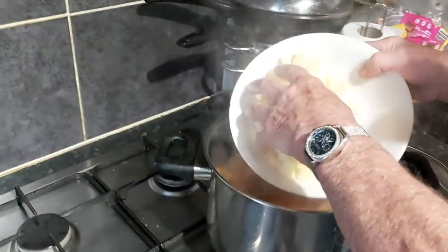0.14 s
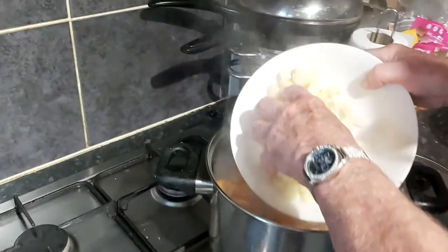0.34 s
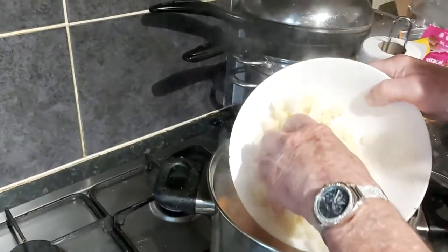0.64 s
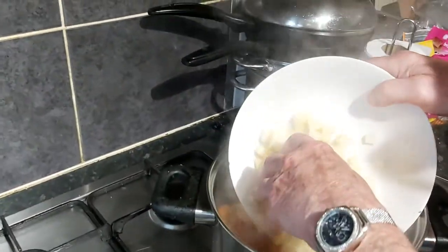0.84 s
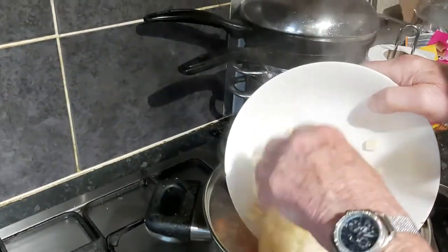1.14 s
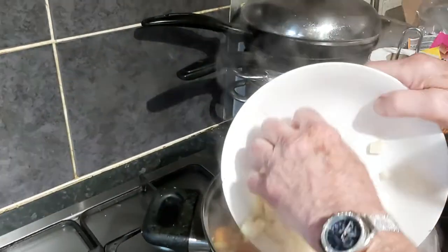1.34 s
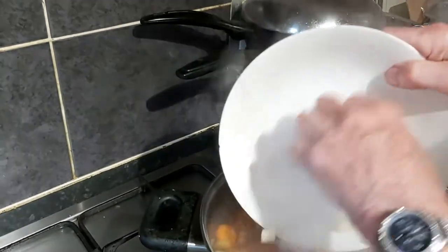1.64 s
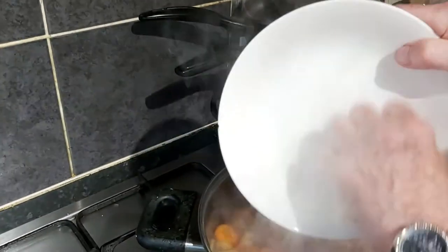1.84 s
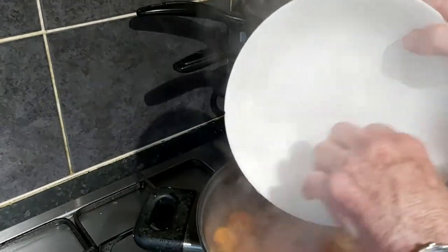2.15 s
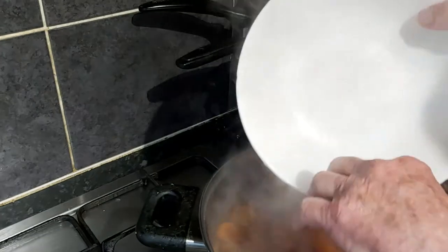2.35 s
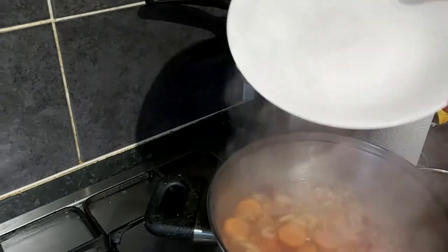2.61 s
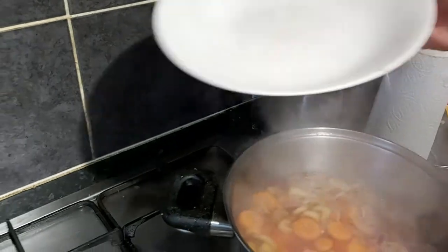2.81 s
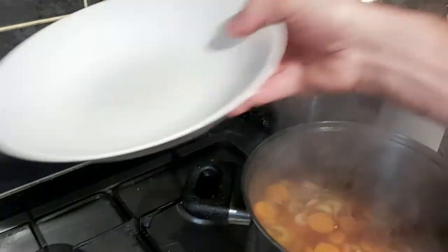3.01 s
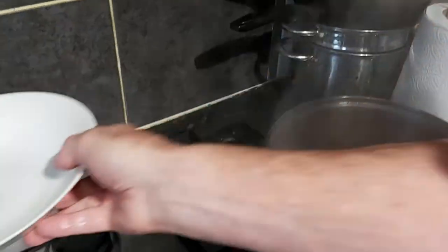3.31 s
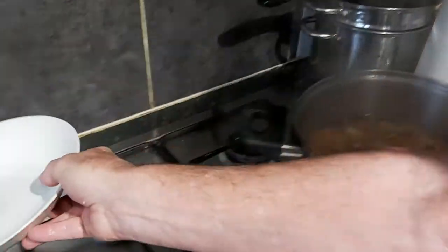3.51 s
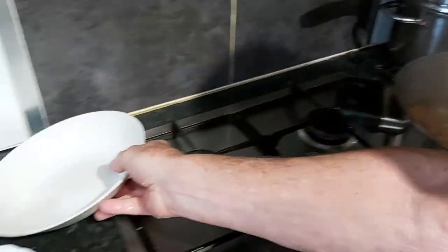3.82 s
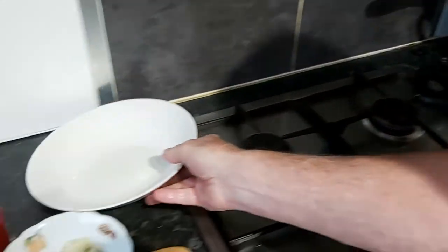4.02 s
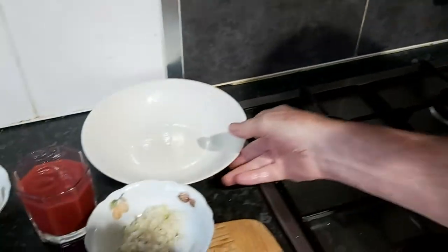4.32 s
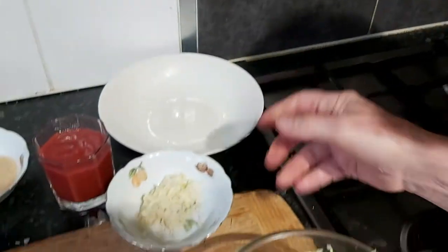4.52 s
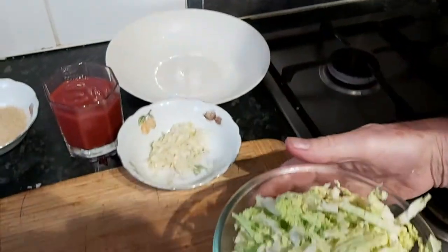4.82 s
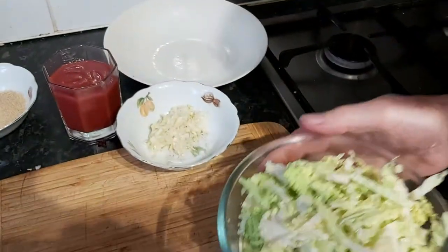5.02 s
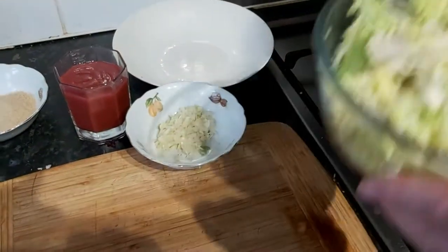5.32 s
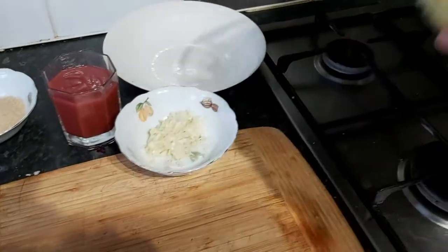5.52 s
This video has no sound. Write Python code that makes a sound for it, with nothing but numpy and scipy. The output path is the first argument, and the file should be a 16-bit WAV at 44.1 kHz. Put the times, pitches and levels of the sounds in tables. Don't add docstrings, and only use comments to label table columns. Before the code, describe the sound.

A small tiled kitchen, heard closely in stereo: a low, patchy pot simmer with faint mains hum and weak, fluttering steam hiss runs throughout. At about 0.46 s the first potato pieces hit the broth with a wet splash and deep gulp. Smaller plops follow around 0.8 to 1.2 s, then the thickest splash from 1.45 to 1.75 s, full of sharp spits, bubbling gulps and droplets. Light drips and faint finger rubbing on the plate fade towards 2.4 s. A soft bump comes at 3.1 s. At 3.89 s the empty ceramic plate strikes stone with the loudest, hard clack, chattering and bouncing until about 4.1 s; a second run of rocking knocks at 4.25 to 4.5 s leaves a short ceramic ring that is choked by 4.8 s. Quiet dish handling follows near 4.8 s as the simmer dips, and a small bright clink-like contact lands at 5.56 s.

```python
import sys
import numpy as np
from scipy import signal
from scipy.io import wavfile

SR = 44100
rng = np.random.default_rng(int(sys.argv[2]) if len(sys.argv) > 2 else 0)


def boost(x):
    u = np.asarray(x, float) / 20
    return 10 ** u


def int16_out(signal):
    q = np.round(np.clip(np.atleast_2d(signal).T, -1, 1) * 32767)
    wavfile.write(sys.argv[1], SR, q.astype(np.int16))


N = 249385


def rms_one(x):
    return x / np.sqrt(np.mean(x ** 2) + 1e-30)


def gain_curve(points):
    s, level_db = np.transpose(points)
    return boost(np.interp(np.arange(N) / SR, s, level_db, -200, -200))


def at_hz(points, hz):
    table_hz, value = np.transpose(points)
    return np.interp(np.log(hz), np.log(table_hz), value)


def drift(rate_hz):
    knots = rng.standard_normal(400)
    return np.interp(np.arange(N) / SR * rate_hz, np.arange(400), knots)


def stroke(start_s, attack_s, hold_s, level_db, fall_db_per_s):
    out = np.zeros(N)
    start = round(start_s * SR)
    t = np.arange(N - start) / SR
    t = t[t < hold_s + 90 / fall_db_per_s]
    fall_db = fall_db_per_s * np.maximum(t - hold_s, 0)
    out[start:start + len(t)] = boost(level_db - fall_db) * np.minimum(t / attack_s, 1)
    return out


def clicks(times_s, gains):
    out = np.zeros(np.shape(gains)[:-1] + (N,))
    out[..., np.round(np.array(times_s) * SR).astype(int)] = gains
    return out


def grains(per_s, spread_db, clump_db):
    sizes = boost(spread_db * np.minimum(rng.exponential(1, N), 4)) * rng.choice([-1, 1], N)
    chance = per_s * boost(clump_db * drift(40)) / SR
    return rms_one(sizes * (rng.random(N) < chance))


def ring(drive, hz, t60_s):
    r = boost(-60 / (t60_s * SR))
    w = 2 * np.pi * hz / SR
    return signal.lfilter([0, np.sin(w)], [1, -2 * r * np.cos(w), r * r], drive + 1e-18)


def radiate(tone, hz, pan_db=0.8, lead_cycles=-0.088):
    left = np.roll(tone, -round(lead_cycles * SR / hz))
    return np.array([left, tone]) * boost(np.minimum([[pan_db], [-pan_db]], 0))


def stereo_bands(spectrum, size):
    # hz, likeness
    likeness = [(60, 0.88), (130, 0.98), (290, 0.6), (640, 0.46), (1410, -0.44), (3100, 0.35),
                (6820, -0.39), (15000, 0.074)]
    # hz, left_right_db
    tilt = [(60, 0), (300, -4), (3000, -2.5), (8000, -4)]
    edges_hz = 35 * 2 ** np.arange(0, 9.1, .5)
    white = rng.standard_normal((2, 2, size))
    for k, (low_hz, high_hz) in enumerate(zip(edges_hz, edges_hz[1:])):
        band = signal.butter(2, [low_hz, high_hz], "band", fs=SR, output="sos")
        mid, side = signal.sosfilt(band, white[k % 2])
        hz = np.sqrt(low_hz * high_hz)
        alike = np.clip(at_hz(likeness, hz), -1, 1)
        gain = boost(at_hz(spectrum, hz) + at_hz(tilt, hz) * np.array([[.5], [-.5]]))
        yield hz, gain * (np.sqrt(1 + alike) * mid + np.sqrt(1 - alike) * side * [[1], [-1]])


def struck(trains, spectrum, t60s, low_hz, high_hz, direct, swell_cycles, crack_s, room_db):
    room_t60_s = 0.35
    size, spots = SR // 4, 3
    t = np.arange(size) / SR
    parts = np.zeros((3, 2, spots, size))
    for hz, band in stereo_bands(spectrum, (spots + 1) * size):
        rise = 1 - np.exp(-t * hz / swell_cycles)
        tail = boost(-60 * t / at_hz(t60s, hz))
        tail += direct * np.exp(-t / crack_s)
        tail += boost(room_db - 60 * t / room_t60_s)
        part = int(hz > low_hz) + int(hz > high_hz)
        parts[part] += band[:, size:].reshape(2, spots, size) * rise * tail
    parts /= np.sqrt(np.sum(parts ** 2, axis=(1, 3), keepdims=True) / 2)
    spot = rng.integers(0, spots, N)
    out = np.zeros((2, N + size - 1))
    for k in range(spots):
        hits = np.float32(trains * (spot == k))
        out += signal.oaconvolve(hits, np.float32(parts[:, :, k]), axes=2).sum(axis=0)
    return out[:, :N]


def simmer():
    # hz, level_db_per_hz
    rumble_spectrum = [(18, -45), (30, -22.5), (53, -5), (70, -26), (103, -17.5), (157, -28), (194, -13.5),
                       (273, -21.5), (364, -8), (437, -14), (684, -24), (2060, -24.5), (2400, -26),
                       (3100, -37.5), (16000, -45)]
    # start_s, level_db
    facing_points = [(0, -0.5), (1.0, 0.5), (3.0, 1), (3.85, -0.5), (4.9, -5), (5.3, -4), (5.65, 1.5)]
    # pitch_hz, level_db, waver_db, share of the facing fall
    hum = [(50, -82.5, 5, .9), (101, -73, -1.5, 1.2), (200, -84, 5, 0.61), (292, -75, 5.5, 0.31),
           (364.6, -69, 4.5, 3.2), (412, -77, 2, 1.2), (469, -78.5, 1.5, 1.3)]
    # start_s, level_db
    steam = [(0.0, -73), (0.13, -71), (0.3, -79.5), (0.84, -85.5), (1.06, -74.5), (1.45, -78.5), (2.3, -77),
             (3.6, -87)]
    facing = gain_curve(facing_points)
    rumble = rms_one(sum(band * boost(0.95 * drift(9.3)) for _, band in stereo_bands(rumble_spectrum, N)))
    out = boost(-67) * rumble * facing
    for hz, level_db, waver_db, fall in hum:
        phase = 2 * np.pi * hz * np.arange(N) / SR + 0.41 * waver_db * drift(12)
        gain = boost(level_db + np.clip(waver_db, 0, 5) * drift(6.5)) * facing ** fall
        out += gain * np.sin(phase) * boost([[-1.1], [1.1]])
    treble = signal.butter(2, 6000, "high", fs=SR, output="sos")
    hiss = rms_one(signal.sosfilt(treble, rng.standard_normal((2, N))))
    flutter = boost(7.0 + 1.5 * drift(24) + 2.5 * drift(57))
    return out + hiss * gain_curve(steam) * flutter * boost([[-2.5], [2.5]])


def droplets(level):
    spray = level * grains(170, 3.7, 9.7)
    dealt = rng.integers(0, 14, N)
    out = np.zeros((2, N))
    for k, hz in enumerate(np.geomspace(1000, 5500, 14)):
        pan_db = 0.81 * rng.standard_normal() + 4.0
        out += ring(spray * (dealt == k), hz, 17.0 / hz) * boost([[pan_db], [-pan_db]])
    return out


def broth():
    # start_s, peak_db, low plop_db re peak,
    # bright spit_db re peak
    splashes = [(0.4623, -30.5, 8, 10.5), (0.4933, -35, -2.5, 8.5), (0.503, -40, -14, -21),
                (0.8129, -40, -2, -18), (0.926, -48, -5, 8), (0.9526, -46, -6, -10), (0.9888, -31, -26, -1),
                (1.0946, -57, 5, -17), (1.1156, -36.5, -3, -10), (1.1586, -44.5, -23, 1),
                (1.175, -44, -22, -11), (1.2008, -42.5, -3.5, -3), (1.3008, -42.5, -35, 5.5),
                (1.4558, -39, -20, 8), (1.5044, -37, -15, -3), (1.5277, -19.5, -49.5, 2.5),
                (1.532, -25, -18, -1.5), (1.583, -29, -19, 3), (1.589, -28.5, -21, -1),
                (1.641, -27, -20, -8), (1.673, -29, -22, -1), (1.6206, -21.5, -16.5, -9.5),
                (1.6269, -20.5, -7.5, -5), (1.6675, -24, -3, 4), (1.6833, -26, -25, -1.5),
                (1.694, -22, -27, -10), (1.7482, -37, 1, 8), (1.868, -43, -4, -25), (1.9779, -53.5, 6, 3),
                (2.0704, -49, 13.5, 4.5), (5.565, -35.5, -31, 5), (5.5738, -44, -44, 6)]
    # start_s, hold_s, level_db, bright_db, fall_db_per_s
    pours = [(0.461, 0.027, -30.5, -1.5, 226), (0.81, 0.016, -46.5, -3, 185), (0.931, 0.092, -57, -2, 153),
             (1.053, 0.22, -62, -1, 23), (1.451, 0.12, -50, 0, 99), (1.53, 0.14, -39, 12, 164),
             (1.623, 0.1, -42, 2.5, 167), (1.903, 0.2, -64.5, 12, 110), (0.58, 0.014, -69, 22, 193),
             (2.286, 0.024, -61.5, -5.5, 266), (4.799, 0.054, -64, -3.5, 300), (5.561, 0.045, -51.5, 2, 60)]
    # hz, level_db_per_hz
    spectrum = [(26, -38), (45, -2.5), (150, -8.5), (239, -9.5), (382, 5.5), (594, -2.5), (689, -4),
                (1440, -9), (1980, -2), (2410, -6), (3850, -10), (5290, -9.5), (11300, -9), (16000, -15.5)]
    # hz, t60_s
    t60s = [(150, 0.48), (600, 0.25), (2000, 0.19), (6000, 0.18), (15000, 0.051)]
    layer_db = [-4.5, -1, -7.5]
    layer_fall = [0.74, 1.0, 1.2]
    layer_tilt = [-2.2, 0, 0.59]
    s, peak_db, plop_db, spit_db = np.transpose(splashes)
    pan_db = 2 + 5 * rng.standard_normal(len(s))
    levels = boost(peak_db + np.array([plop_db + 10.5, 0 * s + 12, spit_db + 12.5]))
    hits = clicks(s, levels[:, None] * boost(np.outer([.5, -.5], pan_db)))
    churn = np.zeros((3, N))
    for layer, tilt, offset_db, share in zip(churn, layer_tilt, layer_db, layer_fall):
        for start_s, hold_s, level_db, bright_db, fall in pours:
            layer += stroke(start_s, 0.0025, hold_s, level_db + offset_db + tilt * bright_db, share * fall)
    rain = np.array([grains(900, 2.3, 2.2), grains(500, 1.4, 6.6), grains(1200, 6.5, 3.9)])
    spray = churn * rain * boost([[-5], [-7], [-5]])
    wet = struck(hits + spray[:, None], spectrum, t60s, 800, 4500,
                 direct=5.5, swell_cycles=0.6, crack_s=0.0028, room_db=-25)
    return wet + boost(-27.5) * droplets(churn[1])


def gulps():
    # start_s,
    # pitch_hz, level_db, t60_s
    pockets = [(0.498, 230, -25.5, 0.047), (0.508, 409, -40.5, 0.08), (0.528, 420, -39, 0.05),
               (0.54, 200, -41, 0.13), (0.562, 286, -37.5, 0.18), (0.592, 320, -49, 0.1),
               (0.83, 294, -44.5, 0.25), (0.845, 287.6, -41, 0.18), (0.88, 294, -49, 0.19),
               (1.092, 880, -50, 0.047), (1.175, 950, -48.5, 0.046), (1.19, 905, -48, 0.04),
               (1.53, 1060, -38.5, 0.022), (1.553, 1143, -41, 0.065), (1.582, 584, -37, 0.07),
               (1.598, 606, -39, 0.074), (1.619, 2270, -35.5, 0.03), (1.627, 1900, -33, 0.04),
               (1.638, 1940, -35, 0.073), (1.644, 547, -37, 0.06), (1.657, 564, -37, 0.062),
               (1.668, 2113, -37, 0.05), (1.68, 542, -30, 0.057), (1.69, 2000, -35, 0.05),
               (1.694, 1530, -41, 0.03), (1.702, 540, -41, 0.068), (1.74, 558, -47, 0.08),
               (1.755, 477, -47, 0.14), (1.773, 1520, -46, 0.044), (1.783, 571, -45.5, 0.08),
               (2.07, 566, -52, 0.04), (0.988, 2200, -43, 0.03), (0.989, 1800, -45, 0.03),
               (1.117, 2100, -52, 0.03), (1.455, 2900, -45, 0.03), (1.456, 3700, -52, 0.025),
               (1.5, 1000, -48, 0.03), (1.505, 2100, -47, 0.03), (1.527, 3900, -34, 0.025),
               (1.529, 2600, -37, 0.04), (1.621, 3600, -40, 0.03), (1.817, 2000, -50, 0.05),
               (1.869, 1600, -48, 0.03), (1.87, 3700, -57, 0.025), (1.977, 1200, -53, 0.03),
               (3.14, 234, -47, 0.055)]
    rise_per_s, wobble_db, wobble_rad = 0.15, 4.0, 0.8
    out = np.zeros(N)
    t = np.arange(SR // 3) / SR
    for s, hz, level_db, t60_s in pockets:
        swell, turn = (np.interp(t * 130, np.arange(60), knots) for knots in rng.standard_normal((2, 60)))
        phase = 2 * np.pi * hz * (t + rise_per_s * t ** 2) + wobble_rad * turn
        gain = boost(level_db - 60 * t / t60_s + wobble_db * swell) * (1 - np.exp(-t * hz / 0.66))
        start = round(s * SR)
        out[start:start + len(t)] += gain * np.sin(phase)
    return out * boost([[-1.2], [1.2]])


def bumps():
    # start_s, level_db, centre_hz
    drips = [(0.786, -77, 13000), (0.975, -66, 14000), (1.009, -55.5, 10600), (1.0596, -62, 13100),
             (1.083, -61, 12900), (1.144, -63, 7000), (1.2336, -61.5, 6040), (1.2907, -65, 10700),
             (1.3447, -65, 10400), (1.3648, -65.5, 2780), (1.817, -62.5, 10400), (1.995, -62.5, 12900),
             (2.042, -64, 9600), (2.062, -64, 13100), (2.098, -65, 12000), (2.119, -66, 9350),
             (2.154, -70, 6960), (2.1847, -69, 6960), (2.22, -72.5, 7200), (2.234, -71, 13000),
             (2.3, -68, 12000), (2.34, -69, 9000), (2.378, -78, 12000)]
    # start_s, centre_hz, width_octaves, level_db, t60_s
    contacts = [(2.287, 990, 2.9, -62, 0.36), (2.294, 2100, 0.33, -63, 0.33),
                (2.33, 2320, 0.78, -59, 0.085), (3.131, 1500, 1.4, -50, 0.12),
                (3.145, 1400, 1.2, -61, 0.32), (4.245, 345, 0.63, -42, .08), (4.256, 340, .4, -47, 0.09),
                (4.268, 350, 0.46, -32.5, 0.19), (3.135, 230, 0.9, -57, 0.4), (4.571, 71, 0.71, -55, 0.32),
                (4.795, 2130, 0.24, -71, 0.49), (4.853, 4070, 0.14, -77, 0.17),
                (4.852, 200, 1.4, -59, 0.38), (4.858, 79.1, 1.23, -66, 0.13),
                (5.564, 4240, 0.55, -41.5, 0.13), (5.575, 1920, 0.97, -42.5, 0.12)]
    puffs = list(contacts) + [(s, hz, 1, level_db, 0.1) for s, level_db, hz in drips]
    out = np.zeros((2, N + SR))
    t = np.arange(SR // 3) / SR
    for s, hz, octaves, level_db, t60_s in puffs:
        edges_hz = np.minimum(hz * 2 ** (octaves * np.array([-.5, .5])), SR / 2.2)
        band = signal.butter(3, edges_hz, "band", fs=SR, output="sos")
        noise = rng.standard_normal((3, len(t)))
        both = noise[:2] + noise[2] * np.clip(600 / hz, 0, 3)
        decay = boost(-60 * t / t60_s) + 3.62 * np.exp(-t / 0.00045)
        puff = signal.sosfilt(band, both * decay)
        gain = boost(level_db - 4.5 * np.array([[.5], [-.5]])) / np.std(puff[:, :SR // 50])
        start = round(s * SR)
        out[:, start:start + len(t)] += gain * puff
    return out[:, :N]


def worktop(drive):
    # hz, level_db_per_hz
    spectrum = [(24, -51), (40, -25.5), (124, -5.5), (199, -15), (337, -8), (663, -9.5), (715, -6.5),
                (896, -8.5), (1630, -18), (2840, -25.5), (3380, -38.5), (4460, -36), (16000, -49.5)]
    # hz, t60_s
    t60s = [(50, 0.18), (130, 0.21), (600, 0.24), (2000, 0.029), (6000, 0.031), (15000, .07)]
    # pitch_hz, level_db, t60_s
    slab = [(60.5, -15, .15), (133.6, 5.5, 0.18)]
    # pitch_hz, level_db, t60_s
    shelf = [(295.5, -9, 0.49), (382, -4.5, .27), (436, -9, .35), (487, -8, .2), (635, -5, .15),
             (880, -6, .1)]
    thud, body, _ = drive
    out = struck(drive[:, None], spectrum, t60s, 250, 3000,
                 direct=2.2, swell_cycles=0.8, crack_s=0.004, room_db=-19)
    for hz, level_db, t60_s in slab:
        out += boost(level_db - 31.5) * ring(thud, hz, t60_s) * boost([[-.7], [.7]])
    for hz, level_db, t60_s in shelf:
        out += radiate(boost(level_db - 40.0) * ring(body, hz, t60_s), hz, -2.5)
    return out


def clack(knock_s, peak_db):
    # pitch_hz, level_db re peak, t60_s
    tones = [(660, -10.5, 0.011), (950, -3.5, .015), (1964, -22, 0.039)]
    out = np.zeros((2, N))
    for hz, level_db, t60_s in tones:
        hits = clicks(knock_s + .0012, boost(peak_db + level_db))
        out += radiate(ring(hits, hz, t60_s), hz)
    return out


def plate_modes(knock_s, peak_db, ring_db, grind, rub):
    plate_hz = [345, 463, 673, 975, 1335, 2132, 2810, 2850, 4538, 4585, 6200, 7040]
    # level_db, t60_s, rub_db
    held_modes = [(-10, 0.4, -29), (-12, 0.28, -16.5), (-0.5, .2, -29), (-13, .1, -23.5),
                  (-21, 0.53, -16.5), (-23, 0.21, -17), (-7.5, 0.12, 1), (-16, 0.06, -1), (-14, 0.15, 0),
                  (-20, 0.06, -4), (-27, 0.043, -20.5), (-22.5, 0.038, -6)]
    # level_db, t60_s
    free_modes = [(-46.5, 0.41), (-48, 0.61), (-37.5, 0.78), (-44, 0.27), (-35, 0.6), (-49.5, 0.4),
                  (-34.5, 0.13), (-37, 0.12), (-67, 0.15), (-66, 0.13), (-86, 0.079), (-89, .1)]
    # left_right_db, left lead_cycles
    beams = [(-2, 0), (-2, 0), (-10, -.04), (-2, -.2), (-8, .38), (0, .1), (-6, .45), (-6, .45), (-7, .48),
             (-7, .48), (6, .3), (18, .2)]
    let_go_s, settled_s, settled_db_per_s = 4.47, 4.76, -120
    low_db = -16.5 + (0.67 - 1) * peak_db
    high_db = -14 + ring_db
    choke = boost(settled_db_per_s * np.maximum(np.arange(N) / SR - settled_s, 0))
    out = np.zeros((2, N))
    for hz, (level_db, t60_s, rub_db), (free_db, free_t60_s), beam in zip(plate_hz, held_modes, free_modes, beams):
        mode_db, spread_db = (low_db, 2.5) if hz < 1800 else (high_db, 3.5)
        spot_db = spread_db * rng.standard_normal(len(knock_s))
        drive = clicks(knock_s, boost(peak_db + mode_db + level_db + spot_db))
        drive += boost(level_db - 34.5) * grind + boost(rub_db - 24.5) * rub
        held = ring(drive, hz, t60_s)
        free = ring(clicks([let_go_s], boost([free_db])), hz, free_t60_s)
        free *= choke ** min(650 / hz, 1) ** 3
        out += radiate(held + free, hz, *beam)
    return out


def plate():
    # start_s, peak_db, flat-landing thud_db, edge hardness_db, high ring_db
    knocks = [(3.888, 0, -12, 7.5, 4), (3.895, -8, -5.5, 12, 6), (3.908, -15, -9.5, 4, 4),
              (3.917, -10.5, -10, 6.5, 10.5), (3.928, -18, -13.5, 4.5, 4.5), (3.939, -15, -19.5, 6.5, 4.5),
              (3.953, -24, -13.5, 2.5, 1), (3.988, -8, -10.5, -8, -7), (3.996, -21, -10, -3, -4.5),
              (4.026, -19, -5, -14, -3.5), (4.034, -26.5, -5, -15, 11), (4.054, -29, -8.5, -15, -6),
              (4.076, -33.5, -7, -17, -10.5), (4.179, -52, 8.5, -10, 6), (4.283, -12, -20, -18, -10),
              (4.304, -6, -16.5, -17.5, -11.5), (4.313, -11, -14, -17.5, -4), (4.324, -17, -11.5, -16, 0),
              (4.357, -5, -14.5, 0.5, -6.5), (4.364, -11.5, -16, -2.5, -3), (4.374, -13.5, -13, -5.5, -3.5),
              (4.388, -26, -11, -4.5, 0.5), (4.405, -8, -11, 3, -1), (4.412, -14, -13.5, 1, -1),
              (4.433, -11, -13, 4, -4), (4.443, -20, -14, -3.5, -8), (4.469, -16, -13, 0.5, -3),
              (4.482, -27.5, -13.5, -1.5, -6), (4.494, -26, -24, -17, 0), (4.515, -33, -21.5, -13, -9)]
    # start_s, hold_s, level_db
    rubs = [(1.868, 0.079, -58.5), (4.145, 0.11, -62), (4.245, .085, -59), (2.288, 0.04, -68),
            (4.797, 0.031, -77)]
    chatter_db = [-34.5, -28, -31]
    chatter_fall = [198.5, 353.5, 400.5]
    s, peak_db, thud_db, hard_db, ring_db = np.transpose(knocks)
    crack_db = -32.5 + hard_db
    hits = clicks(s, boost(peak_db + np.array([thud_db + 18.0, 0 * s + 12, crack_db + 14.0])))
    chatter = np.array([boost(db) * signal.lfilter([1], [1, -boost(-fall / SR)], train + 1e-18)
                        for train, db, fall in zip(hits, chatter_db, chatter_fall)])
    grind = chatter * grains(500, 3.5, 5.0)
    rub = sum(stroke(start_s, 0.011, hold_s, db, 291.5) for start_s, hold_s, db in rubs)
    rub = rub * grains(3000, 2.4, 3.3)
    landed = np.arange(N) > s[0] * SR
    drive = hits + grind + rub * landed * boost([[6], [4], [-20]])
    return worktop(drive) + clack(s, peak_db) + plate_modes(s, peak_db, ring_db, grind[1], rub)


def bell(hz, width_hz, db):
    w, a = 2 * np.pi * hz / SR, boost(db / 2)
    k = np.sin(w) * width_hz / hz / 2
    zeros = [1 + k * a, -2 * np.cos(w), 1 - k * a]
    poles = [1 + k / a, -2 * np.cos(w), 1 - k / a]
    return np.array(zeros + poles) / (1 + k / a)


def scene():
    return simmer() + broth() + plate() + gulps() + bumps()


def low_pass(x):
    return signal.sosfilt(signal.butter(12, 16670, fs=SR, output="sos"), x)


def record(dry):
    # centre_hz, width_hz, level_db
    housing = [(3160, 440, -6.5), (5560, 1300, -3), (7400, 870, 3.5), (9000, 1400, -4.5)]
    limited = 1.1 * np.tanh(dry / 1.1)
    top = signal.cheby2(12, 70, 16800, fs=SR, output="sos")
    bass = signal.butter(4, 55, "high", fs=SR, output="sos")
    colour = [bell(*row) for row in housing]
    return low_pass(signal.sosfilt(np.vstack([top, bass, colour]), limited))


dry = scene()
out = record(dry)
int16_out(out)
```